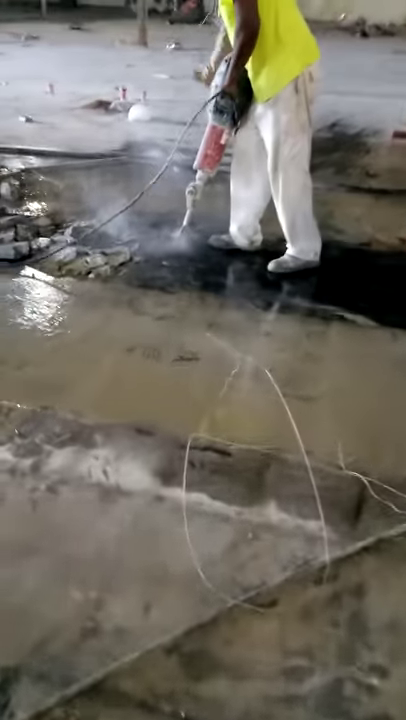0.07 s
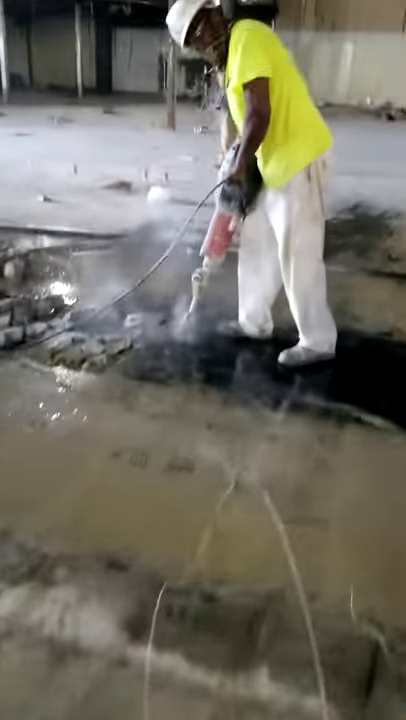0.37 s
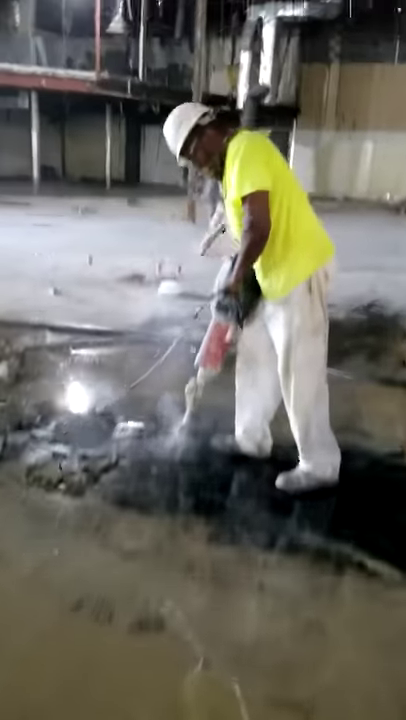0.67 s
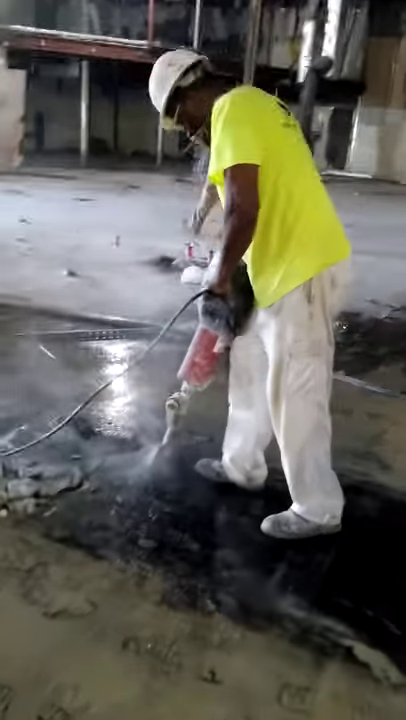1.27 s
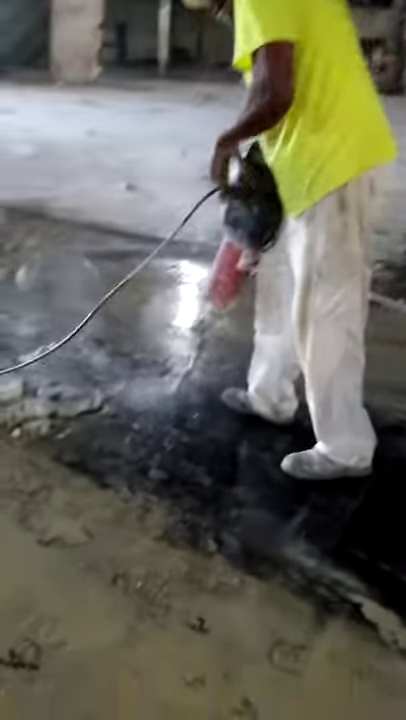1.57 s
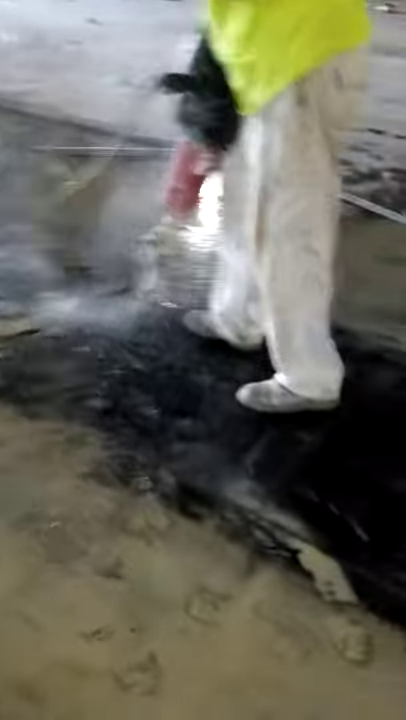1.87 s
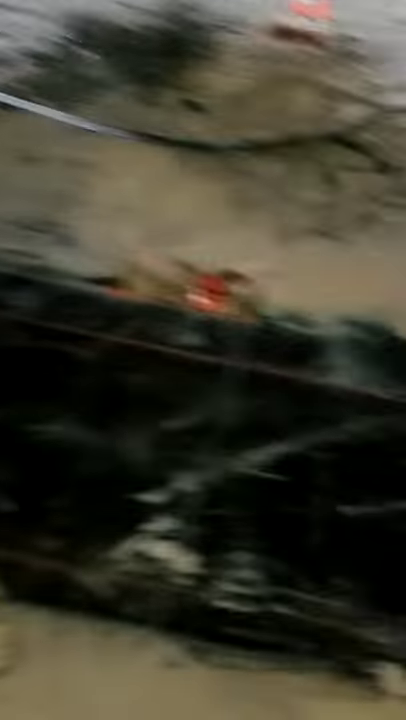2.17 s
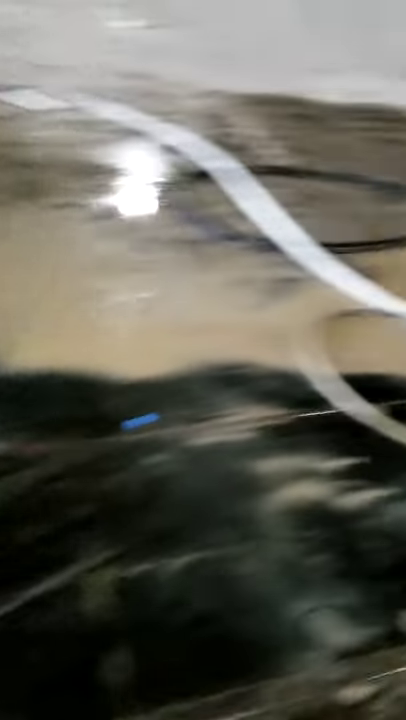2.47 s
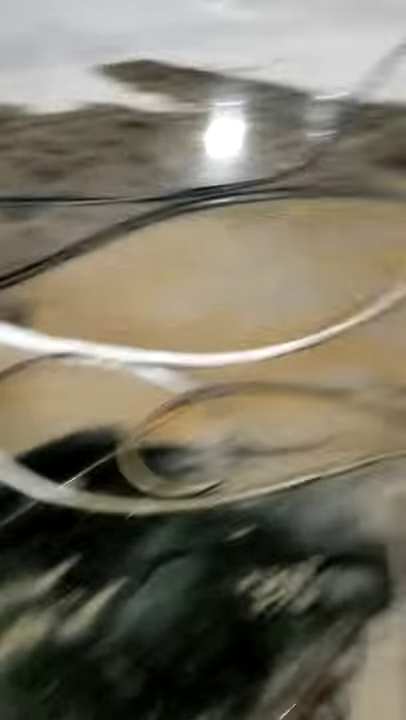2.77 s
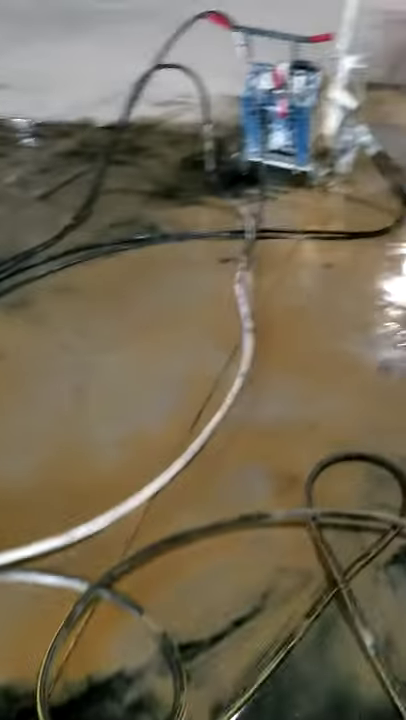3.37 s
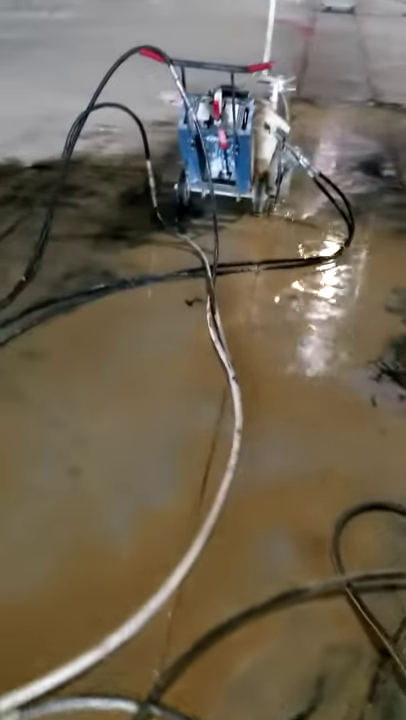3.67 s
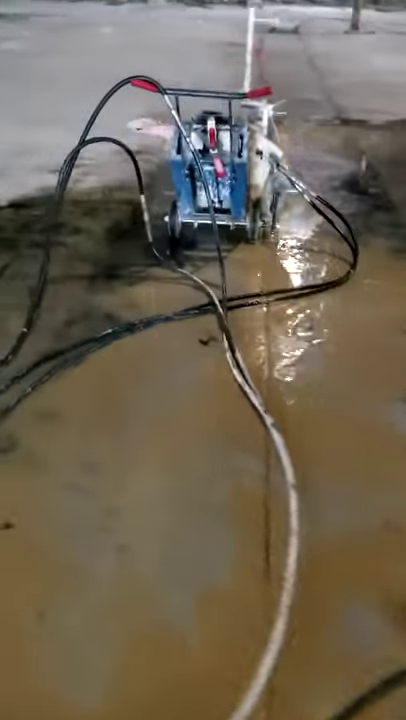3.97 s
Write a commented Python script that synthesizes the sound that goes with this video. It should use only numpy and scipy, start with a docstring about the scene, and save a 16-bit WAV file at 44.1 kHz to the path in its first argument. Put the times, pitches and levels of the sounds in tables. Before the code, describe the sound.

An electric jackhammer pounds a concrete floor for the whole 4 seconds, about thirteen blows a second, each with a thud, a gritty crack and a steel ring. Loose chips clink, and bits of slab give way with short knocks near 0.2, 1.2, 2.4 and 3 seconds. Other machines rush steadily in the large hall. From about 2.8 seconds the microphone turns away and the hammering becomes duller and more echoing.

```python
"""An electric breaker hammers a concrete floor thirteen times a second in a large hall.
Each blow thuds, cracks the concrete and rings the steel chisel until it seats again. Loose chips
clink, and now and then a piece of slab gives way. The ceiling and the hall throw the sound back
over the rush of other machines. Late on, the microphone turns away and the treble fades."""
import sys
import numpy as np
from scipy import signal
from scipy.fft import rfft, irfft
from scipy.io import wavfile
from scipy.ndimage import uniform_filter1d, minimum_filter1d

SR = 44100
rng = np.random.default_rng(int(sys.argv[2]) if len(sys.argv) > 2 else 0)


def dump(signal):
    """Clip the signal to [-1, 1] and save it as 16-bit WAV at the path in sys.argv[1]."""
    limited = np.clip(np.atleast_2d(signal).T, -1, 1)
    pcm = np.round(limited * 32767).astype(np.int16)
    wavfile.write(sys.argv[1], SR, pcm)


N = 176400


def amp(db):
    return 10 ** (np.asarray(db) / 20)


def unit(x):
    """Scales a signal to an average power of one."""
    return x / np.sqrt(np.mean(x ** 2) + 1e-20)


def look_up(table, hz, column=1):
    columns = np.transpose(table)
    return np.interp(np.log(hz + 1), np.log(columns[0] + 1), columns[column])


def add(mix, start, sound):
    part = mix[:, max(round(start * SR), 0):][:, :sound.shape[-1]]
    part += sound[..., :part.shape[1]]


def colour(x, spectrum):
    """Makes some frequencies louder and others softer."""
    hz = np.fft.rfftfreq(x.shape[-1], 1 / SR)
    return irfft(rfft(x) * unit(amp(look_up(spectrum, hz))), x.shape[-1])


# How the sound changes as the microphone moves: (time [s], thud level [dB], thud pitch [factor],
# treble level [dB], steel and stone sent to the echoes [dB], head start of the right side [ms])
MIC_PATH = [(0, -26, 0.74, -19.5, 1, 0.23), (.95, -25.5, 0.86, -10.5, -1, -0.058),
            (1.5, -21.5, 0.997, -14.5, -3.5, 0.05), (2.3, -20, 1.003, -19, -3.5, -0.027),
            (2.85, -18, 1.03, -26, -0.5, 0.37), (3.45, -24, 1.22, -50.5, 7.5, 0.52),
            (4, -15.5, 1, -41, 10, 0.48)]
THUD, PITCH, TREBLE, ECHO, LEAD = 1, 2, 3, 4, 5

def mic(time, column):
    """One column of the microphone's path at the given time."""
    columns = np.transpose(MIC_PATH)
    return np.interp(time, columns[0], columns[column])


# The hammer's blows: (time [s], chisel ring level [dB], concrete crunch level [dB])
BLOWS = [(0.0044, -12.0, -21.5), (0.0802, -10.0, -19), (0.1561, -14.0, -19.5), (0.2317, -13.0, -18),
         (0.3074, -17.0, -19), (0.3843, -13.5, -17.5), (0.4605, -14.0, -18.5), (0.5362, -14.5, -18.5),
         (0.612, -13.5, -21), (0.6862, -12.5, -21), (0.7619, -12.5, -23), (0.8381, -13.5, -23.5),
         (0.9114, -15.0, -23.5), (0.9883, -13.0, -24), (1.0634, -10.5, -27), (1.1369, -14.5, -22.5),
         (1.2128, -17.5, -21), (1.2902, -12.5, -22), (1.366, -8.5, -20), (1.4436, -6.5, -21),
         (1.5192, -9.0, -21), (1.5942, -10.0, -17), (1.6701, -12.5, -20), (1.7464, -12.5, -18),
         (1.8225, -11.5, -19.5), (1.9003, -10.0, -21), (1.9769, -7.5, -16), (2.0537, -6.5, -18),
         (2.1289, -9.5, -13), (2.2046, -12.0, -14), (2.2808, -10.0, -14), (2.3572, -10.0, -14.5),
         (2.4329, -12.5, -17), (2.5094, -12.5, -21), (2.5856, -15.5, -17), (2.662, -15.0, -23),
         (2.7387, -12.5, -22), (2.8154, -16.5, -26), (2.8917, -17.0, -24), (2.9682, -19.0, -23),
         (3.0433, -23.5, -16.5), (3.121, -20.5, -23), (3.1974, -17.0, -20.5), (3.2715, -21.5, -21),
         (3.349, -22.0, -23), (3.4268, -23.0, -22), (3.5018, -21.5, -27), (3.5794, -20.5, -26),
         (3.6552, -19.0, -25), (3.7313, -20.0, -25), (3.8074, -21.0, -27), (3.8837, -20.0, -24.5),
         (3.9605, -16.0, -26)]
# Tones of the tool body and slab: (frequency [Hz], level [dB], time to fade by 60 dB [s])
BODY_TONES = [(272.4, 0, 0.016), (434, -3, 0.0092), (804, -3.5, 0.01), (1150, -4, 0.0094)]

def thuds(gain_db=5, second_knock_s=0.002557, low_cut_hz=208):
    """Each blow is a quick double knock on the tool body and the slab."""
    out, t = np.zeros((2, N)), np.arange(SR // 20) / SR
    for start, _, _ in BLOWS:
        pitch, thud_db = mic(start, PITCH), mic(start, THUD)
        side_delay = np.array([[.5], [-.5]]) * mic(start, LEAD) / 1000
        age = np.maximum(t - side_delay - .0002, 0)
        dull_db = .3 * (thud_db + 25)  # close up, the two deepest tones stand out
        knock = 0
        for hz, db, fade_s in BODY_TONES:
            fade = amp(db - dull_db * (hz > BODY_TONES[1][0]) - 60 * age / fade_s)
            detune = 1 + .08 * rng.standard_normal()
            knock += fade * np.sin(2 * np.pi * hz * pitch * detune * age)
        for delay, knock_db in (0, 0), (second_knock_s / pitch, -6):
            add(out, start + delay, amp(thud_db + knock_db + gain_db) * knock)
    return signal.sosfilt(signal.butter(4, low_cut_hz, "high", fs=SR, output="sos"), out)


def steel_tones(t, hz, db, detune_hz, rattle, fade_s=.18, rattle_s=.007):
    """Fading tones that chatter, a little different at every blow and on each side."""
    chance = rng.standard_normal((7, len(hz), 1))
    phase = np.exp(2j * np.pi * rng.random((len(hz), 1)))
    sides = 1 + .25 * (chance[:2] + 1j * chance[2:4])
    gain = amp(db)[:, None] * amp(3 * chance[4]) * sides * phase
    gain *= np.linalg.norm(amp(db)) * np.sqrt(2) / np.linalg.norm(gain)  # keep the total power
    gain[1] *= np.exp(1.6j * chance[5])  # the right side is out of step
    noise = rng.standard_normal((2, len(hz), len(t)))
    wobble = unit(signal.lfilter([1], [1, -np.exp(-1 / (rattle_s * SR))], noise))
    chatter = (1 + rattle * (wobble[0] + 1j * wobble[1])) / np.sqrt(1 + 2 * rattle ** 2)
    tones = np.exp(2j * np.pi * (hz[:, None] + detune_hz * chance[6]) * t) * amp(-60 * t / fade_s)
    return (gain[..., 0] @ (tones * chatter)).real


# Main tones of the bending chisel: (frequency [Hz], level [dB], pitch spread between blows [Hz],
# extra level for each dB of a harder blow [dB])
CHISEL_TONES = [(4680, -3, 28.7, -0.46), (4814, 0.5, 28.6, -0.55), (5070, 1, 13.6, 0.4559)]
# Its weaker tones: (frequency [Hz], level [dB])
CHISEL_OVERTONES = [(2620, -13), (3345, -8.5), (6340, -8.5), (6880, -6.5), (7800, -7.5), (8345, -13),
                    (9245, -17.5), (9860, -8), (10405, -10.5), (11070, -11), (11280, -7.5), (11650, -19),
                    (12400, -8), (13870, -10.5), (14770, -18.5), (15620, -20.5)]
RISE_S = 0.0012

def chisel(seated_fade_s=0.025, typical_ring_db=-15.5, typical_treble_db=-20):
    """The steel rings after each blow and is hushed when it seats in the concrete again."""
    out, t = np.zeros((2, N)), np.arange(SR // 12) / SR
    hz, db, spread_hz, extra_db = np.transpose(CHISEL_TONES)
    over_hz, over_db = np.transpose(CHISEL_OVERTONES)
    for start, ring_db, _ in BLOWS:
        free_s = .034 + 0.016 * rng.uniform(-1, 1)
        seating = amp(-60 * np.maximum(t - free_s, 0) / seated_fade_s)
        harder_db = ring_db - typical_ring_db
        facing_db = mic(start, TREBLE) - typical_treble_db
        shift_db = -16.5 + 0.22 * harder_db + 0.59 * facing_db * (over_hz / over_hz[-1]) ** 2
        main = steel_tones(t, hz, db + ring_db + extra_db * harder_db, spread_hz[:, None], rattle=.35)
        overtones = steel_tones(t, over_hz, over_db + shift_db, detune_hz=26, rattle=.8)
        add(out, start, seating * (main + overtones) * np.minimum(t / RISE_S, 1))
    return out


def splinter(x, bump_db=6, bump_width_hz=450):
    """Every splinter has its own uneven tone colour."""
    hz = np.fft.rfftfreq(x.shape[-1], 1 / SR)
    bumps = rng.standard_normal(64)
    gain = amp(bump_db * np.interp(hz / bump_width_hz, np.arange(len(bumps)), bumps))
    return irfft(rfft(x) * unit(gain), x.shape[-1])


# Tone colour of concrete being crushed: (frequency [Hz], level [dB])
CRUSH_COLOUR = [(100, -62), (600, 7), (1300, -2.5), (4500, 5), (7500, -9), (16000, -15)]
# Tone colour of splintering at the tip: (frequency [Hz], level [dB])
SPLINTER_COLOUR = [(5000, -27.5), (8900, -21), (10000, -16), (11800, 0), (13300, -11.5), (16000, -7)]

def concrete(bounce_s=.021, crack_s=0.0025, grit_s=0.0099, splinter_s=0.0086):
    """Grainy bursts of crushing and splintering, at the blow and again as the chisel bounces."""
    crush, chips, t = np.zeros((2, N)), np.zeros((2, N)), np.arange(SR // 10) / SR
    crush_fade = np.exp(-t / crack_s) + amp(-14.5) * np.exp(-t / grit_s)
    chip_fade = np.exp(-t / splinter_s)
    for start, _, crunch_db in BLOWS:
        later, louder = rng.standard_normal(2)
        for delay, db in (0, 0), (bounce_s + .001 * later, -8.5 + 3 * louder):
            noise = rng.standard_normal((2, len(t)))
            grain_db = 4 * np.minimum(rng.exponential(1, len(t)), 4)
            grains = unit(noise * amp(grain_db)) * np.minimum(t / RISE_S, 1) * amp(db)
            add(crush, start + delay, grains * amp(6.5 + crunch_db) * crush_fade)
            add(chips, start + delay, splinter(grains) * amp(2.5 + mic(start, TREBLE)) * chip_fade)
    return colour(crush, CRUSH_COLOUR) + colour(chips, SPLINTER_COLOUR)


# Loudness of the loose chips, highest once the slab gives way: (time [s], level [dB])
CLATTER_LEVELS = [(1.9, -40), (2.6, -37.5), (4, -40.5)]

def clatter(low_hz=1947, high_hz=3647, fade_s=0.047, mean_wait_s=0.028):
    """Loose chips of concrete, large and small, clink against the chisel after each blow."""
    out, t = np.zeros((2, N)), np.arange(SR // 15) / SR
    for start, _, _ in BLOWS:
        for pitch, wait, size, left_phase, right_phase in rng.random((8, 5)):
            hz = low_hz * (high_hz / low_hz) ** pitch
            tone = np.sin(2 * np.pi * (hz * t + np.array([[left_phase], [right_phase]])))
            add(out, start - mean_wait_s * np.log(1 - wait), tone * amp(-60 * t / fade_s) * size ** 2)
    return unit(out) * amp(np.interp(np.arange(N) / SR, *np.transpose(CLATTER_LEVELS)))


# How alike left and right sound in the hall: (frequency [Hz], likeness [0 to 1])
SIDE_LIKENESS = [(320, 0.86), (950, 0.028)]

def room_noise(size):
    """Noise from all around, alike on both sides only in the bass."""
    left, other = rfft(rng.standard_normal((2, size)))
    alike = look_up(SIDE_LIKENESS, np.fft.rfftfreq(size, 1 / SR))
    right = alike * left + np.sqrt(1 - alike ** 2) * other
    return irfft(np.array([left, right]), size)


# Tone colour of the other machines: (frequency [Hz], level [dB])
RUSH_COLOUR = [(20, -44), (100, -33), (190, 5), (1200, -6), (3500, 0), (6000, -4), (8500, -13),
               (16000, -12)]

def machines(level_db=-33.5, swell_db=0.5):
    """Other machines in the hall make a steady rush that wavers slightly."""
    swell = unit(uniform_filter1d(uniform_filter1d(rng.standard_normal(N), 3000), 3000))
    return colour(room_noise(N), RUSH_COLOUR) * amp(level_db + swell_db * swell)


def apply_echo(x, echo):
    return signal.oaconvolve(x, echo, axes=1)[:, :N]


def near_echoes(x, db, decay_s=0.022):
    """Sound scatters back from the floor and nearby things."""
    t = np.arange(SR // 8) / SR
    echo = room_noise(len(t)) * np.exp(-t / decay_s) * (t > .003)
    return amp(db) * apply_echo(x, echo / np.linalg.norm(echo[0]))


# The hall's long echo: (frequency [Hz], time to fade by 60 dB [s], level [dB])
HALL_ECHO = [(150, 0.51, -18.5), (800, 1.9, -10.5), (3460, 1.25, -5), (5200, 1.43, -3.5), (13900, 0.13, -7)]

def hall(x, shift_hz=1.7):
    """A long wash of echoes whose pattern shifts as the microphone moves."""
    out, clock = np.zeros((2, N)), np.arange(N) / SR
    for k in range(3):  # three echo patterns take turns
        hz, t, bands = signal.stft(room_noise(SR), SR, nperseg=256)
        fade_s, db = look_up(HALL_ECHO, hz)[:, None], look_up(HALL_ECHO, hz, column=2)[:, None]
        same_energy = np.sqrt(2 * np.log(1000) / fade_s / SR)  # a longer fade starts softer
        bands *= amp(db - 60 * t / fade_s) * same_energy
        tail = signal.istft(bands * (t > .012), SR, nperseg=256)[1]
        share = np.sqrt(2 / 3) * np.cos(2 * np.pi * (shift_hz * clock + k / 3))
        out += apply_echo(x * share, tail)
    return out


# Pieces of slab giving way: (time [s], level [dB], frequency [Hz], time to fade by 60 dB [s])
SLAB_BREAKS = [(.234, -23.5, 680, 0.054), (1.214, -23.5, 802, 0.046), (2.436, -36.5, 68.4, 0.1),
               (2.439, -15.5, 1380, 0.026), (3.044, -15, 2150, 0.019)]

def slab_breaks():
    """Now and then a loosened piece of slab gives a short knock."""
    out, t = np.zeros((2, N)), np.arange(SR // 5) / SR
    for start, db, hz, fade_s in SLAB_BREAKS:
        add(out, start, amp(db - 60 * t / fade_s) * np.sin(2 * np.pi * hz * t))
    return out


def scene(ceiling_s=0.0205, ceiling_db=-19):
    """Mixes the breaker, its echoes and the machines; the knocks also bounce off the ceiling."""
    knocks = thuds() + slab_breaks()
    steel_and_stone = chisel() + concrete() + clatter()
    to_room = steel_and_stone * amp(mic(np.arange(N) / SR, ECHO))
    echoes = near_echoes(knocks, db=-9) + near_echoes(to_room, db=-7) + hall(knocks + to_room)
    out = knocks + steel_and_stone + echoes + machines()
    add(out, ceiling_s, amp(ceiling_db) * knocks)
    return out


def record(dry, limit_db=-1.5, hold_s=.001, top_hz=15900):
    """A fast limiter turns down the loudest peaks, then a filter cuts the highest treble."""
    hold = int(hold_s * SR) + 1
    gain = np.minimum(amp(limit_db) / (abs(dry).max(0) + 1e-9), 1)
    limited = dry * uniform_filter1d(minimum_filter1d(gain, hold), hold)
    treble_cut = signal.firwin(401, top_hz, window=("kaiser", 8), fs=SR)
    return signal.oaconvolve(limited, treble_cut[None], "same")


dry = scene()
out = record(dry)
dump(out)
```